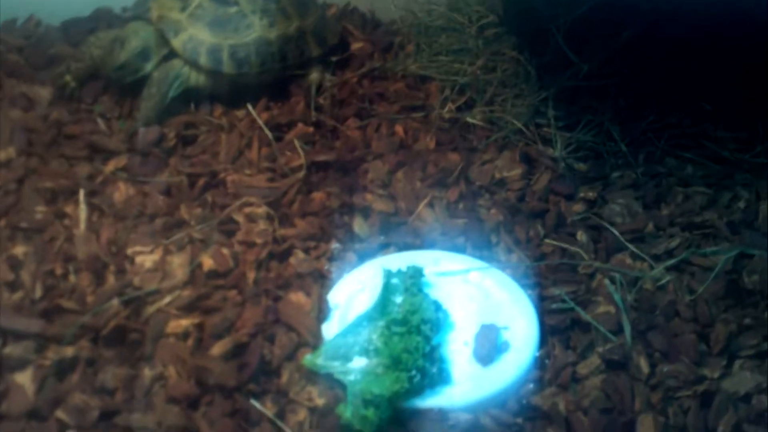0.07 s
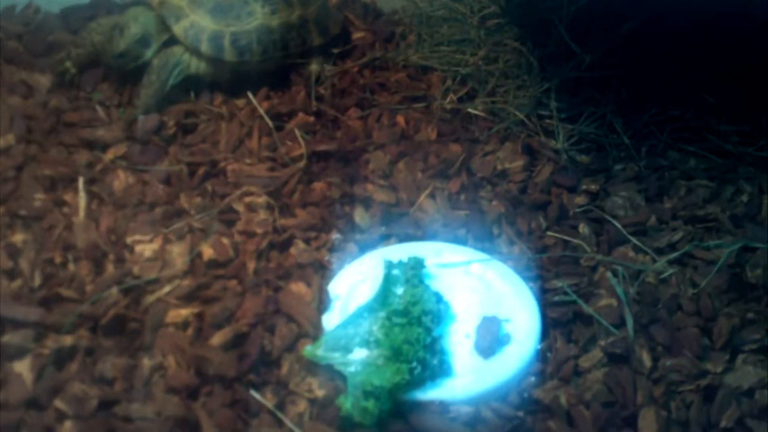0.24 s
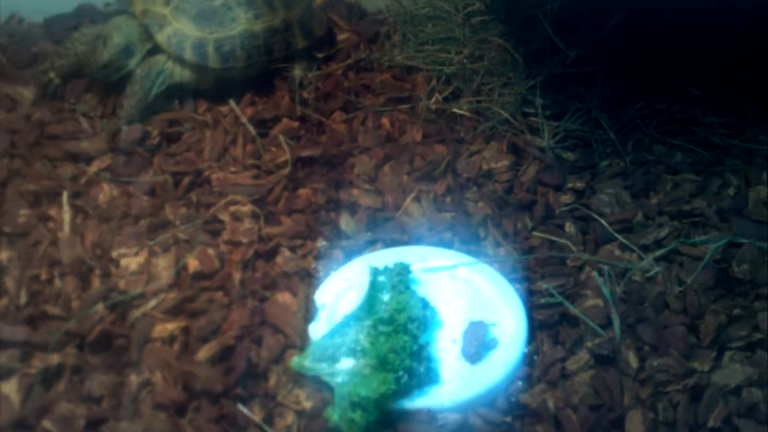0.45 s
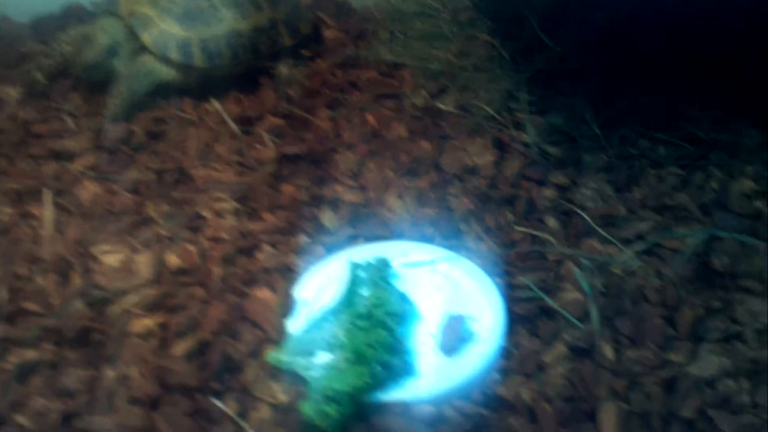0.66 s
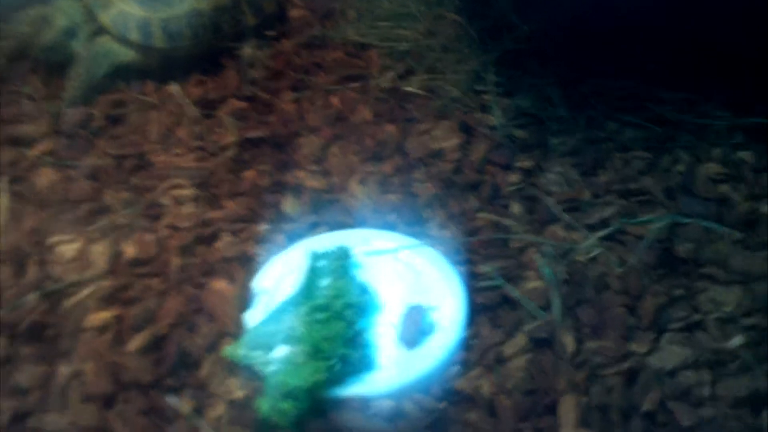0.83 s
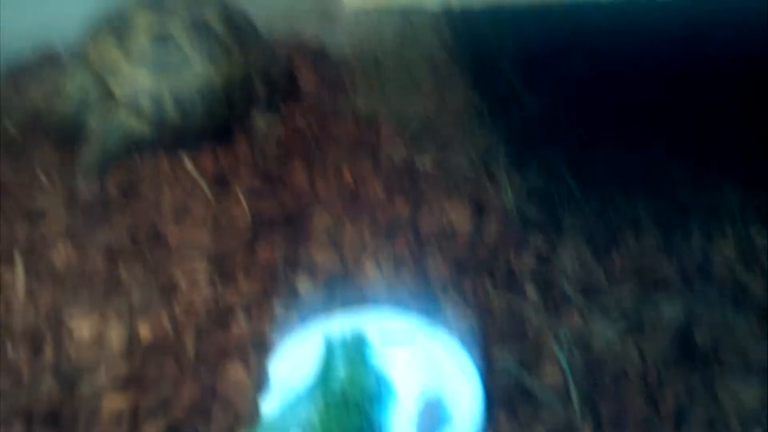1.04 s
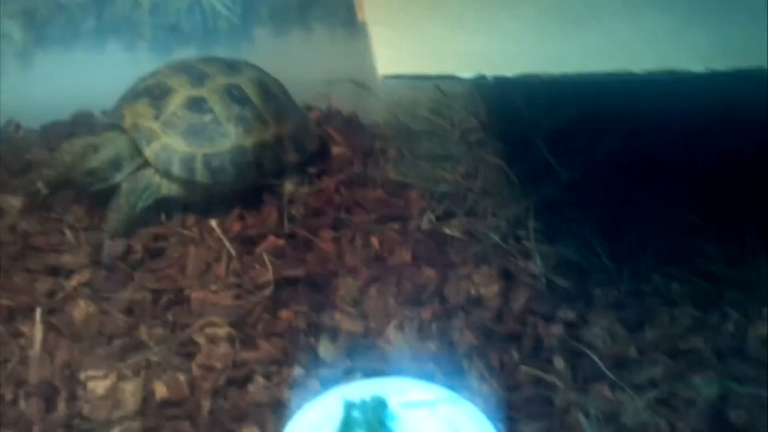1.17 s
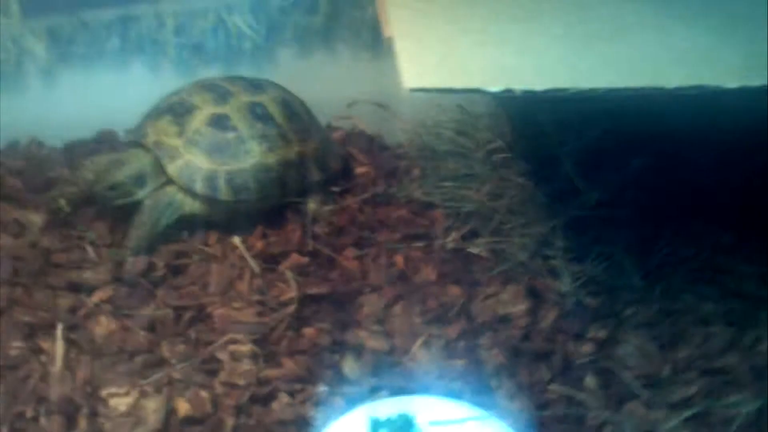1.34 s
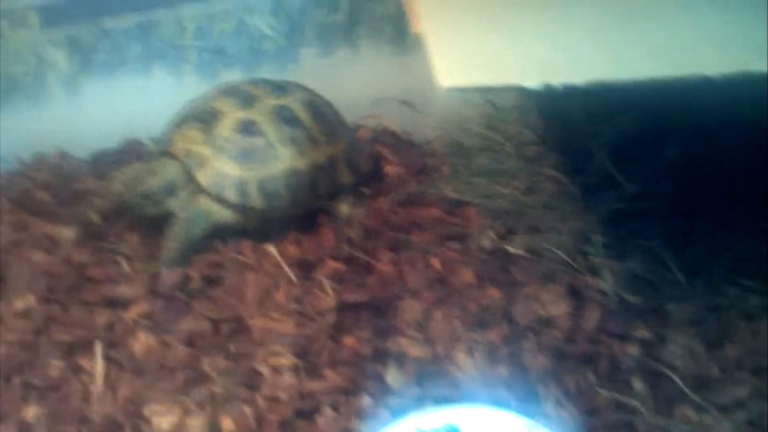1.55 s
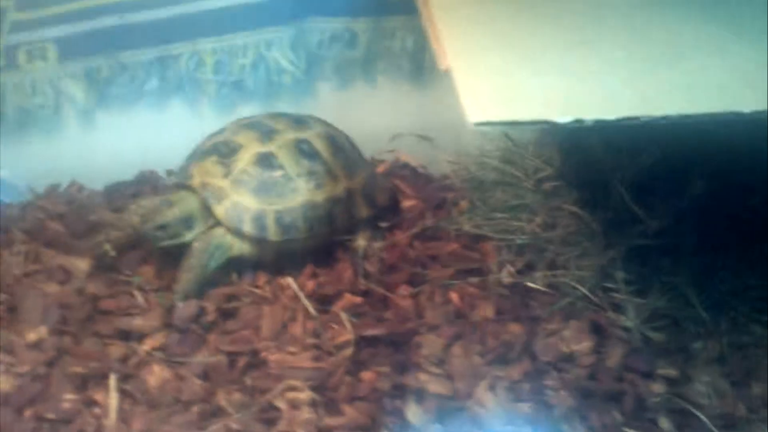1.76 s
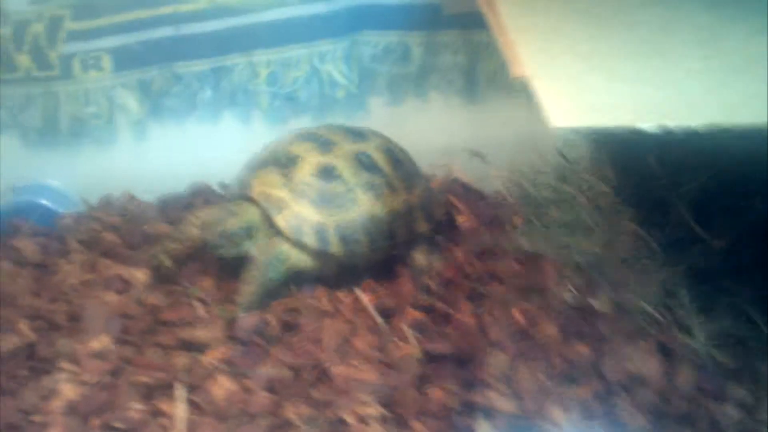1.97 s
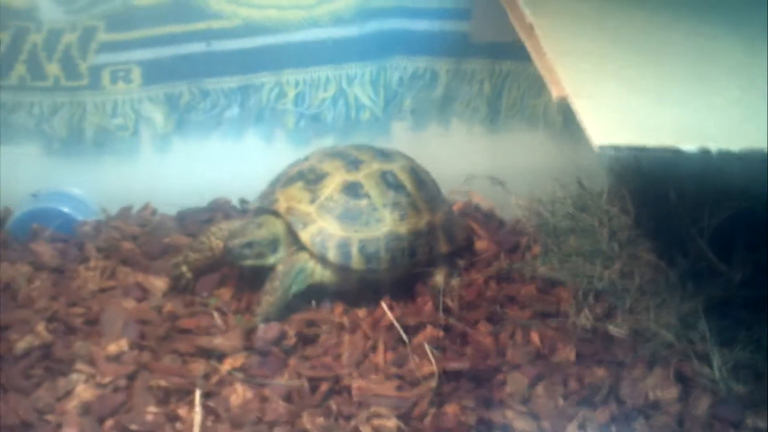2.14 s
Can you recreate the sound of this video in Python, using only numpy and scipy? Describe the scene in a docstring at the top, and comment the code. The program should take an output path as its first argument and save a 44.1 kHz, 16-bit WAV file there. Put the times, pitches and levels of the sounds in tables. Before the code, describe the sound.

Handling noise from a small camera: a dull bump and a few sharp plastic clicks.

```python
"""A quiet room, where a small hand-held camera is shifted in the grip above a tortoise pen.
A finger scrapes the case by stick-slip friction and bumps it once. The plastic shell clicks
sharply a few times, each impulse exciting its damped modes. Then skin slides softly over it
as the camera tilts, above room tone and microphone hiss. Two closely spaced capsules pick
up the sound, and their stereo image is widened by delayed subtraction."""
import sys
import numpy as np
from scipy import signal
from scipy.fft import rfft, irfft
from scipy.io import wavfile
from scipy.ndimage import uniform_filter1d

SR = 44100
rng = np.random.default_rng(int(sys.argv[2]) if len(sys.argv) > 2 else 0)


def put_to_file(sound):
    """Save the sound as 16-bit audio at rate SR, in the file named by the first command-line argument."""
    columns = np.atleast_2d(sound).T  # one column per channel
    safe = np.clip(columns, -1, 1)
    whole_steps = np.round(safe * 32767)
    wavfile.write(sys.argv[1], SR, whole_steps.astype(np.int16))


N = 97020
BIN_HZ = np.fft.rfftfreq(N, 1 / SR)

# Clicks of the shell. Each row: start in seconds, level in dB, contact cutoff in Hz, pitch ratio,
# gains in dB of the bass, middle and upper modes and of the crack, ratio of ring length.
SHELL_CLICKS = [(0.29, -20.5, 2600, 0.90, -2.5, 15.5, 6, -22, 1.35),
                (0.4036, 2.5, 3450, 1.057, -4.5, -2.5, -6, -32, 1.17),
                (0.592, 0.16, 3150, 1.023, -3, -1.5, -1, -29, 1.03),
                (0.6638, -31.5, 3950, 1, -4, 9.5, -7, -15, 1.3),
                (0.8634, -0.5, 2900, 1.003, -1.5, 3, 4, -28, 1.04),
                (1.9597, -43.5, 1660, 1.08, 8.5, -4, -2, -25, 2.7)]
# Modes of the shell, which each click scales. Each row: frequency in Hz, level in dB, T60 in seconds.
SHELL_MODES = [(340, -23.5, .013), (510, -9.5, 0.014), (610, -16, 0.013), (790, -16, 0.021),
               (1088, -21, 0.012), (1488, -8.5, 0.012), (1620, -10.5, .0097), (2114, -13, 0.0092),
               (2330, -18.5, 0.015), (3750, -24.5, 0.0085), (4760, -13.5, 0.0078)]
# Borders in Hz between the bass, middle, main and upper modes.
REGISTER_BORDERS_HZ = [950, 1300, 2000]
# Spectrum of a click's noisy crack. Each row: frequency in Hz, relative level in dB.
CRACK_SPECTRUM = [(500, -18), (2500, 11), (4500, 5.5), (7000, 3), (10000, -5.5), (15500, -3.5)]
CRACK_T60_S, SNAP_T60_S, SNAP_DB = 0.026, 0.0025, 0.5  # the snap is the crack's sharp front


def shell_clicks():
    """Impulse excitation: the spot struck weights the shell's modes, and a softer contact dulls them."""
    out = 0
    for start, db, contact_hz, pitch, bass_db, middle_db, upper_db, crack_db, length in SHELL_CLICKS:
        spot_db = [bass_db, middle_db, 0, upper_db]
        modes = [(hz * pitch, mode_db + spot_db[np.searchsorted(REGISTER_BORDERS_HZ, hz)], t60 * length)
                 for hz, mode_db, t60 in SHELL_MODES]
        contact = signal.butter(4, contact_hz, fs=SR, output="sos")
        shell = signal.sosfilt(contact, -ring(start, modes))
        crack_envelope = fade(start, CRACK_T60_S) + undb(SNAP_DB) * fade(start, SNAP_T60_S)
        crack = undb(crack_db) * crack_envelope * noise(CRACK_SPECTRUM)
        out = out + undb(db) * (through_case(shell + crack) + case_rattle(start))
    return out


# Spectrum of the fingertip's push. Each row: frequency in Hz, relative level in dB.
PUSH_SPECTRUM = [(40, -44), (100, -23), (200, -5), (350, -4), (580, 0), (950, -4), (1450, -13), (2000, -10),
                 (2900, -38), (6000, -49), (16000, -77)]
# Modes of the case where the fingertip lands. Each row: frequency in Hz, level in dB, T60 in seconds.
CASE_MODES = [(1070, -19.5, 0.011), (3560, -32, 0.0077), (4850, -42, .011)]
BUMP_START_S, PUSH_DB, BUMP_RATTLE_DB = .2020, 24.5, -13.5


def fingertip_bump():
    """Damped impact: a soft fingertip gives the case one dull push and a brief ring."""
    cepstrum = irfft(np.log(undb(PUSH_DB + at_hz(PUSH_SPECTRUM))), N)
    # Folding the cepstrum gives a minimum-phase pulse, with its energy at the front.
    cepstrum[1:N // 2] *= 2
    cepstrum[N // 2 + 1:] = 0
    pulse = irfft(np.exp(rfft(cepstrum)), N)
    push = np.roll(pulse, int(BUMP_START_S * SR))
    thud = through_case(ring(BUMP_START_S, CASE_MODES) - push, left_first=True)
    return thud + undb(BUMP_RATTLE_DB) * case_rattle(BUMP_START_S)


# Spectrum of the case's rattle. Each row: frequency in Hz, relative level in dB.
RATTLE_SPECTRUM = [(60, -51), (250, 6), (500, 7.5), (850, 5), (1600, 0), (2400, 1), (3500, -16.5),
                   (7000, -24.5), (15000, -49)]
RATTLE_DB, RATTLE_RISE_S, RATTLE_T60_S = -20.5, .003, 0.034
ROOM_DB, ROOM_T60_S = -43, 0.25


def case_rattle(start):
    """Free decay: the rattle builds after a blow and dies quickly, leaving faint room reverberation."""
    decay = undb(RATTLE_DB) * fade(start, RATTLE_T60_S) + undb(ROOM_DB) * fade(start, ROOM_T60_S)
    build_up = 1 - np.exp(-(since(start) / RATTLE_RISE_S) ** 2)
    return build_up * decay * diffuse(RATTLE_SPECTRUM, LEFT_DB)


# Slips of a finger on the plastic. Each row: peak time in seconds, level in dB,
# rise and fall time constants in seconds, relative level of the case's response in dB.
FINGER_SLIPS = [(0.0525, -58.5, 0.0006, 0.0057, 9), (0.1305, -48, 0.00059, 0.0011, -19),
                (0.190, -51, 0.023, 0.0034, 1), (0.1852, -44, 0.0014, 0.0024, 12.5),
                (0.1992, -38, 0.0033, 0.00097, 5), (0.2019, -17, 0.00086, 0.00038, -4.5),
                (0.8759, -30.5, .0005, 0.0028, 1), (0.8850, -61.5, .004, 0.045, 13.5),
                (1.16, -51.5, 0.0019, 0.005, -20), (1.599, -53.5, 0.013, 0.0027, -5.5),
                (1.865, -56.5, .0006, 0.0019, -20), (1.961, -58.5, .0005, 0.003, 6)]
# Spectra of the slip and of the case's response. Each row: frequency in Hz, relative level in dB.
SLIP_SPECTRUM = [(300, 11.5), (1500, 0.5), (2800, -13), (3700, 5), (4600, -2.5), (7200, 2.5), (10000, 6),
                 (12500, -6.5), (15500, -9)]
BODY_SPECTRUM = [(80, -9), (330, -2.5), (600, 9), (1000, -3.5), (1600, -2.5), (3000, -19.5), (12000, -28.5)]


def finger_scrapes():
    """Stick-slip friction: a finger catches and lets go in short bright bursts that stir the case."""
    bright, body = 0, 0
    for peak_s, db, rise_s, fall_s, body_db in FINGER_SLIPS:
        t = since(peak_s)
        burst = undb(db) * np.exp(-np.abs(t) / np.where(t < 0, rise_s, fall_s))
        bright = bright + burst
        body = body + undb(body_db) * burst
    return bright * diffuse(SLIP_SPECTRUM, left_db=-2) + body * diffuse(BODY_SPECTRUM, left_db=-3.5)


# Course of the skin's slide over the case. Each row: time in seconds, level in dB.
SLIDE_LEVELS = [(0, -65.5), (.58, -61.5), (.65, -50.5), (.76, -54), (.85, -56.5), (.96, -58.5), (1.08, -55),
                (1.17, -56.5), (1.3, -59.5), (1.42, -59.5), (1.5, -57.5), (1.62, -60.5), (1.7, -65.5),
                (2.2, -63)]
# Spectrum of the friction. Each row: frequency in Hz, relative level in dB.
SLIDE_SPECTRUM = [(150, 9.5), (600, 5.5), (1200, 6.5), (2000, 3.5), (2900, -0.5), (4500, 3), (6800, -2.5),
                  (9500, -7), (15500, -11)]
# Borders in Hz between friction bands whose levels drift very slightly, each on its own.
SLIDE_BORDERS_HZ = [1220, 3500, 6800]
SLIDE_DRIFT_DB, SLIDE_GRAIN_DB = 0.1, 1


def skin_slide():
    """Sliding friction: skin on plastic makes broadband noise, made grainy by a fast flicker in level."""
    friction = rfft(diffuse(SLIDE_SPECTRUM, left_db=-2.5))
    band = np.searchsorted(SLIDE_BORDERS_HZ, BIN_HZ)
    rub = sum(irfft(friction * (band == k), N) * undb(SLIDE_DRIFT_DB * wobble(samples=3000))
              for k in range(len(SLIDE_BORDERS_HZ) + 1))
    grain = undb(SLIDE_GRAIN_DB * wobble(samples=110))
    return envelope(SLIDE_LEVELS) * grain * rub


# Course of the grip's rustle. Each row: time in seconds, level in dB.
GRIP_LEVELS = [(0, -60), (.5, -64), (.88, -61), (1.0, -55), (1.14, -52), (1.3, -57.5), (1.6, -66),
               (2.2, -64.5)]
# Spectrum of the rustle. Each row: frequency in Hz, relative level in dB.
GRIP_SPECTRUM = [(80, -29), (220, -10), (300, 6), (440, 2), (700, -8.5), (1400, -44), (4000, -35.5)]


def grip_rustle():
    """Handling noise: a low rustle swells and fades as the hand moves the camera."""
    return envelope(GRIP_LEVELS) * diffuse(GRIP_SPECTRUM, left_db=-9.5)


# Spectra of the room tone and the microphone hiss. Each row: frequency in Hz, relative level in dB.
ROOM_TONE_SPECTRUM = [(20, 7), (50, -3), (90, 0), (145, 5.5), (200, -4), (290, 0), (480, -5.5), (760, -12),
                      (950, -4), (1300, -18.5), (2500, -26.5), (6000, -46), (16000, -41.5)]
HISS_SPECTRUM = [(200, 7.5), (2000, 0), (4500, -2), (7000, -1.5), (10000, -1.5), (15500, -7)]
ROOM_TONE_DB, HISS_DB = -55.5, -65


def background():
    """Stationary noise: low room tone and broad microphone hiss form the noise floor."""
    room_tone = undb(ROOM_TONE_DB) * diffuse(ROOM_TONE_SPECTRUM, left_db=-4.0)
    hiss = undb(HISS_DB) * diffuse(HISS_SPECTRUM, left_db=-1.5)
    return room_tone + hiss


# Coherence of the two capsules before widening. Each row: frequency in Hz, correlation.
CAPSULE_COHERENCE = [(120, 0.71), (400, 0.68), (800, 0.72), (1500, 0.17), (3000, 0.011)]
WIDENING_DELAY_S, LEFT_DB = 16 / SR, -4.5


def widening():
    """Delayed subtraction of each capsule from the other: gives the delay and coherence per frequency."""
    delay = np.exp(-2j * np.pi * BIN_HZ * WIDENING_DELAY_S)
    return delay, at_hz(CAPSULE_COHERENCE)


def through_case(x, left_first=False):
    """Structure-borne sound shakes the nearer capsule; widening sends it across late and inverted."""
    delay, coherence = widening()
    if left_first:
        return np.array([undb(LEFT_DB) * x, irfft(-delay * rfft(x), N)])
    all_pass = (coherence - delay) / (1 - coherence * delay)
    return np.array([undb(LEFT_DB) * irfft(rfft(x) * all_pass, N), x])


def diffuse(spectrum, left_db):
    """Comb filtering: widening makes noise central and wide by turns along frequency."""
    delay, coherence = widening()
    mid_power = (1 + coherence) * np.abs(1 - delay) ** 2
    side_power = (1 - coherence) * np.abs(1 + delay) ** 2
    mid_share = mid_power / (mid_power + side_power)
    mid = rfft(noise(spectrum)) * np.sqrt(mid_share)
    side = rfft(noise(spectrum)) * np.sqrt(1 - mid_share)
    left_gain = undb(left_db * np.sqrt(2 * mid_share))  # the balance is even where the noise is widest
    return irfft(np.array([left_gain * (mid + side), mid - side]), N)


def ring(start, modes):
    """Modal superposition: one blow sets off a sum of damped cosines."""
    t = since(start)
    return sum(undb(db) * fade(start, t60) * np.cos(2 * np.pi * hz * t) for hz, db, t60 in modes)


def noise(spectrum):
    """Spectral shaping: white noise takes the given spectrum and is scaled to unit variance."""
    x = irfft(rfft(rng.standard_normal(N)) * undb(at_hz(spectrum)), N)
    return x / x.std()


def wobble(samples):
    """Moving averages smooth white noise into a random drift of unit variance."""
    x = uniform_filter1d(rng.standard_normal(N), size=samples, mode="wrap")
    x = uniform_filter1d(x, size=samples // 2, mode="wrap")
    return x / x.std()


def fade(start, t60):
    """Exponential decay from a sudden onset, falling 60 dB in t60 seconds."""
    t = since(start)
    return (t >= 0) * np.exp(-np.log(1000) * np.abs(t) / t60)


def envelope(levels):
    """Gain interpolated in decibels over time."""
    return undb(np.interp(since(0), *np.array(levels).T))


def at_hz(points):
    """A table interpolated on a log-frequency axis at every frequency bin."""
    hz, values = np.array(points, float).T
    return np.interp(np.log(np.maximum(BIN_HZ, 1)), np.log(hz), values)


def since(start):
    """Seconds since a moment, for every sample."""
    return np.arange(N) / SR - start


def undb(db):
    """Decibels to amplitude ratio."""
    return 10 ** (np.asarray(db) / 20)


def scene(low_cut_hz=217):
    """Superposition: clicks, bump and scrapes with their deep bass filtered out, rubbing, noise floor."""
    touches = shell_clicks() + fingertip_bump() + finger_scrapes()
    low_cut = signal.butter(2, low_cut_hz, "high", fs=SR, output="sos")
    return signal.sosfilt(low_cut, touches) + skin_slide() + grip_rustle() + background()


def record(dry, ceiling=.95, top_hz=16000):
    """Soft saturation rounds the highest peaks, and a steep low-pass filter limits the bandwidth."""
    rounded = dry / (1 + (dry / ceiling) ** 8) ** (1 / 8)
    return signal.sosfilt(signal.ellip(8, .2, 70, top_hz, fs=SR, output="sos"), rounded)


dry = scene()
out = record(dry)
put_to_file(out)
```